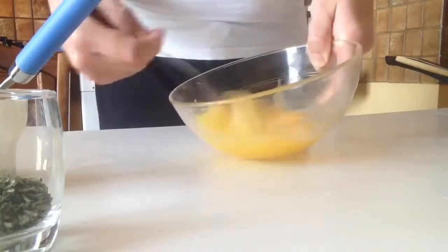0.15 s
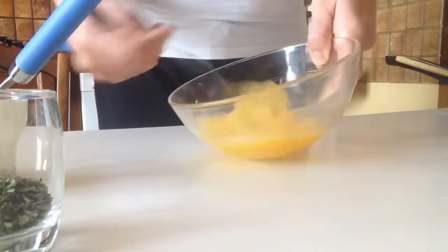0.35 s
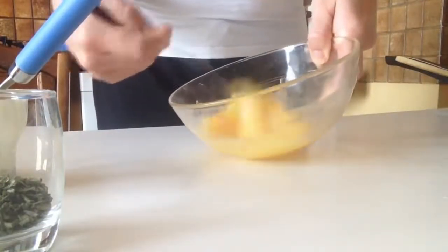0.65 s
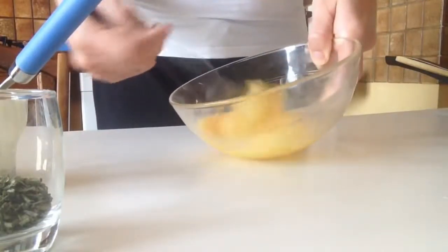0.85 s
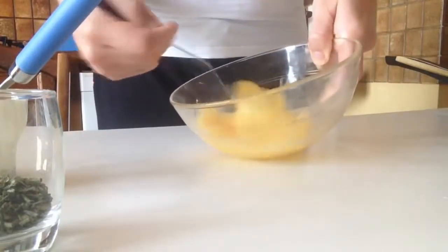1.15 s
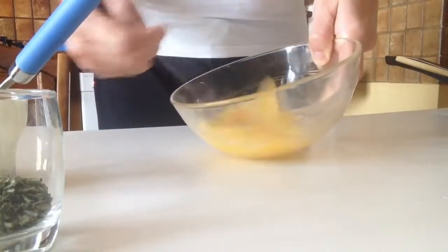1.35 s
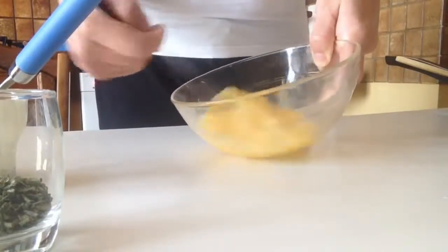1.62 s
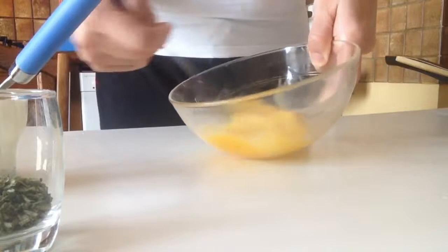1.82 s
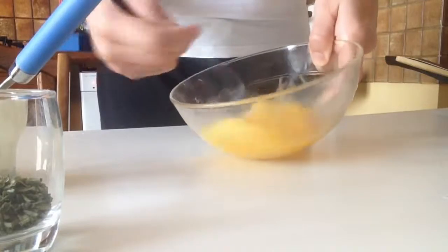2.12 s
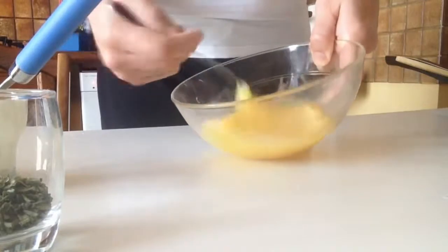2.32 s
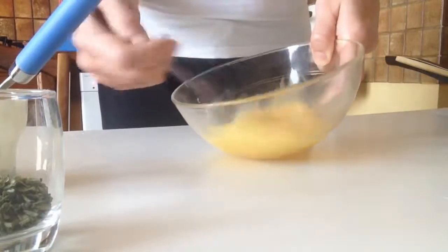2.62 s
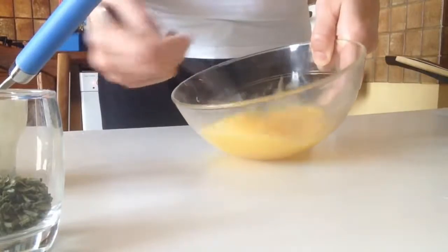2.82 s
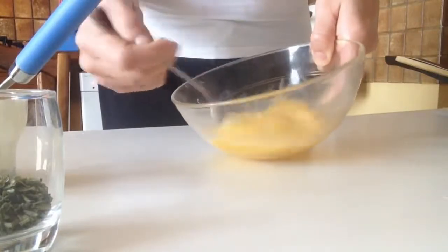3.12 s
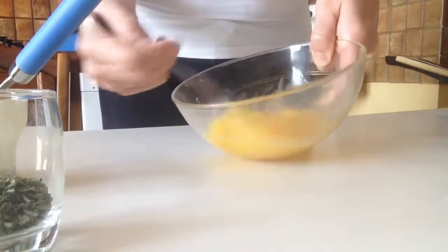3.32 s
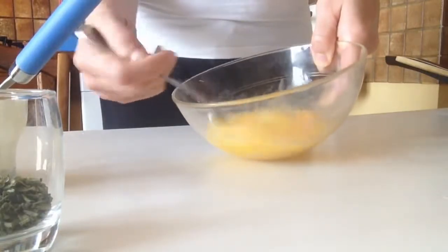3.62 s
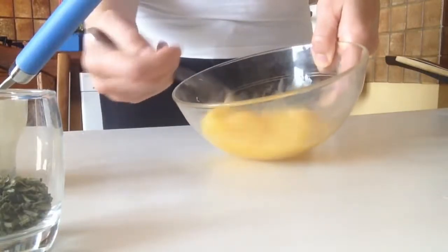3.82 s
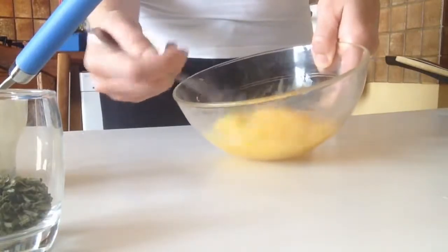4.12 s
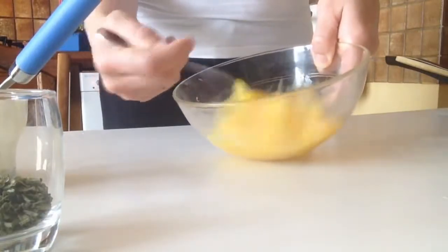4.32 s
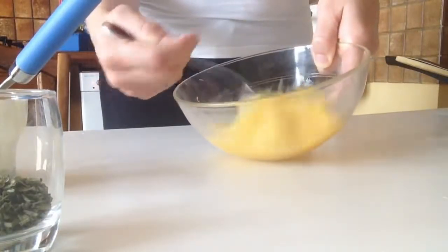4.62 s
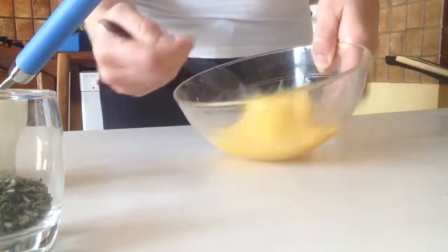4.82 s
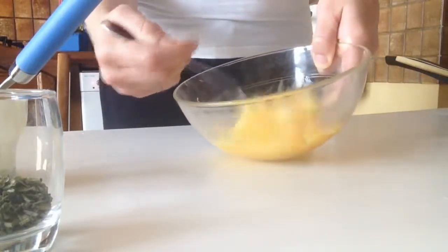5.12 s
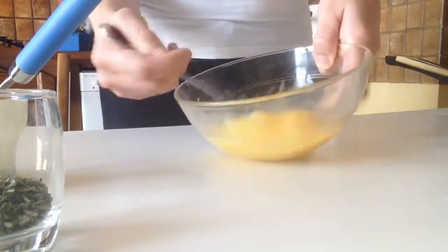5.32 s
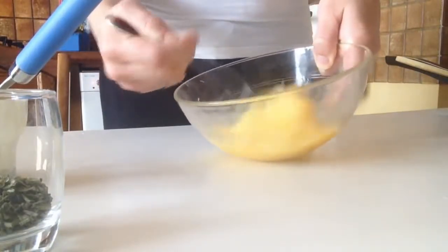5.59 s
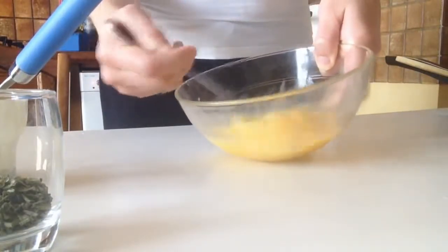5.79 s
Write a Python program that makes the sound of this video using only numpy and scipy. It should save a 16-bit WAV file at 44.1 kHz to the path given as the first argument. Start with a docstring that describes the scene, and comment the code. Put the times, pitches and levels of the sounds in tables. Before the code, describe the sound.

Close to the microphone, fork tines clink hard against a glass bowl five times, thumping the counter and slapping liquid egg. The sound dips for a moment, then settles into fast, lighter whisking: bright clicks, short skids on the glass, splashes and little bubbly plops, with a stronger knock just before the end. A tiled kitchen adds a short echo over faint, even room noise.

```python
"""A tiled kitchen, one small microphone close to a hand-held glass bowl of eggs on the counter.
A steel fork opens with five hard knocks that ring the bowl wall, thump the counter and run on into
scrapes. Egg splashes, the room answers over a steady hush, and air pockets plop. After a short lull near
one second the beating goes on more lightly, about six strokes a second, the tines knocking and skidding
on the glass. One harder knock comes just before the end, at about six seconds."""
import sys
import numpy as np
from scipy import signal
from scipy.fft import rfft, irfft
from scipy.io import wavfile
from scipy.ndimage import uniform_filter1d

SR = 44100
rng = np.random.default_rng(int(sys.argv[2]) if len(sys.argv) > 2 else 0)


def transcribe(signal):
    """Save signal, clipped to [-1, 1], as a 16-bit WAV file at the path in sys.argv[1]."""
    frames = np.atleast_2d(signal).T
    limited = np.clip(frames, -1, 1)
    pcm = np.round(limited * 32767).astype(np.int16)
    wavfile.write(sys.argv[1], SR, pcm)


N = 262395

# Modes rung by both knocks and skids. Each row: pitch in Hz, level in dB, time to fall 60 dB in seconds.
TINE_MODES = [(5836, -9, 0.012), (6620, -8, 0.011), (6880, -2, 0.0056), (7570, -3, 0.0076),
              (8830, -2.5, 0.004), (8610, -15.5, 0.0023), (10080, -8.5, 0.0086), (11410, -8.5, 0.0029),
              (11420, -3, 0.0089), (12500, -0.5, 0.0026), (13280, -7.5, 0.0089), (15650, -2.5, 0.0057)]   # fork tines in egg
BOWL_FLOOR_MODES = [(1090, -2, 0.012), (1500, -4.5, 0.026), (1950, 4, 0.0096), (2430, -2.5, 0.018),
                    (2973, -8, 0.018), (3364, -8.5, 0.019), (4410, -11, 0.01)]   # damped by the egg
BOWL_WALL_MODES = [(1550, -3.5, 0.029), (1870, -9.5, 0.04), (2612, -2.5, 0.046), (2670, -7, 0.043),
                   (3937, 0, 0.026), (3996, -3.5, 0.05), (5520, -10, 0.032), (5512, -13, 0.11),
                   (5523, 5, 0.05), (7210, -3, 0.099), (7300, -11.5, 0.17), (8100, -24, 0.034),
                   (9400, 1.5, 0.011), (11200, -10, 0.027), (12800, -11, 0.065)]   # held in the hand; the strong modes split into beating pairs


def from_db(db):
    """Decibels to gain."""
    return 10 ** (np.asarray(db) / 20)


def at_hz(points, hz):
    """Reads a table on a log-frequency axis."""
    point_hz, values = np.transpose(points)
    return np.interp(np.log(np.maximum(hz, 1)), np.log(point_hz), values)


def ring(clicks, hz, t60):
    """A unit click sets a decaying sine of height 1 ringing."""
    r, w = from_db(-60 / (t60 * SR)), 2 * np.pi * hz / SR
    return signal.lfilter([0, np.sin(w)], [1, -2 * r * np.cos(w), r * r], clicks + 1e-18)


def excite(clicks, modes):
    """A click train rings all modes of one body."""
    return sum(from_db(db) * ring(clicks, hz, t60) * (-1) ** k for k, (hz, db, t60) in enumerate(modes))


def strike(times, level_db, modes, spread_db, detune, contact_s, stagger_s, later_db,
           spot_hz=None, spot_db=0):
    """Each blow rings all modes with its own strengths and detuning; four tines land a moment apart."""
    mode_hz, mode_db, t60 = np.transpose(modes)
    t = np.arange(int(1.2 * t60.max() * SR))[:, None] / SR
    decay = (1 - np.exp(-t / contact_s)) * from_db(-60 * t / t60)
    chance = rng.standard_normal((len(times), 4, 3, len(modes)))
    lag = rng.random((len(times), 4)) * [0, 1, 1, 1]
    out = np.zeros(N + 2 * len(t) + 1000)
    for k, (s, db) in enumerate(zip(times, level_db)):
        hz, gain_db = mode_hz * (1 + detune * chance[k, 0, 1]), mode_db + db
        if spot_hz is not None:
            nearest = np.argmin(abs(np.log(mode_hz / spot_hz[k])))
            hz[nearest] = spot_hz[k]
            gain_db[nearest] += spot_db
        waves = decay * np.sin(2 * np.pi * t * hz)
        for (strength, _, sign), late in zip(chance[k], lag[k]):
            height = from_db(gain_db + spread_db * strength + later_db * (late > 0)) * np.sign(sign)
            at = int((s + late * stagger_s) * SR)
            out[at:at + len(t)] += waves @ height
    return out[:N]


def fork_on_glass(times, tine_db, floor_db, wall_db, spot_hz):
    """Tines, bowl floor and wall ring together; the spot hit favours and retunes the nearest floor mode."""
    tines = strike(times, tine_db, TINE_MODES, spread_db=3.5, detune=0.027,
                   contact_s=0.00053, stagger_s=0.003, later_db=-7)
    floor = strike(times, floor_db, BOWL_FLOOR_MODES, spread_db=3.5, detune=0.058,
                   contact_s=0.00096, stagger_s=0.003998, later_db=-9, spot_hz=spot_hz, spot_db=6.5)
    wall = strike(times, wall_db, BOWL_WALL_MODES, spread_db=3, detune=0.00061,
                  contact_s=0.0012, stagger_s=0.0022, later_db=-6)
    return tines + floor + wall


def counter_thump(times, thump_db):
    """A knock thumps the counter: one low, quickly damped mode."""
    return strike(times, thump_db, [(324.3, 0, 0.025)], spread_db=1.9, detune=0.11,
                  contact_s=0.00091, stagger_s=0.0018, later_db=-16.5)


def booms(times, thump_db):
    """The counter and the room's lowest modes swell after a thump and ring on."""
    # Each row: pitch in Hz, level in dB, time to fall 60 dB in seconds.
    high_modes = [(259.3, 0.5, 0.27), (325.4, -3.5, 0.36), (376.5, -9.5, 0.23), (450.4, -3.5, 0.16),
                  (515, -28, 0.12)]
    deep_modes = [(140.3, -1.5, 0.19), (174.6, -2, 0.46), (209.8, 1.5, 0.15)]
    high_db, deep_db = thump_db - 15.5, 0.52 * thump_db - 27
    out = 0
    for modes, level_db, swell_s in [(high_modes, high_db, 0.068), (deep_modes, deep_db, 0.0066)]:
        for hz, db, t60 in modes:
            heights = from_db(level_db + db + rng.normal(0, 2.6, len(times)))
            clicks = np.zeros(N)
            clicks[(times * SR).astype(int)] = heights * rng.choice([-1, 1], len(times))
            out = out + ring(clicks, hz, t60) - ring(clicks, hz, swell_s)
    return out


def uneven_clicks(per_s, spread_db):
    """Clicks at random moments, most small and a few large."""
    sizes = from_db(spread_db * np.minimum(rng.exponential(1, N), 4)) * rng.choice([-1, 1], N)
    return sizes * (rng.random(N) < per_s / SR)


def skid(times, floor_db, wall_db):
    """After a knock the tines skid over the glass in dense clicks, reaching the wall where it is dry."""
    # Knocks that run on into a firm scrape. Each row: start in seconds, pressure in dB, length in seconds.
    scrapes = [(0.0004, -42.5, .1), (0.152, -48.5, 0.11), (0.2963, -40, .11), (0.4722, -43.5, .13),
               (0.6519, -55, 0.078), (1.5932, -47.5, 0.11), (1.8864, -51.5, .1), (2.0592, -45.5, 0.057),
               (2.2423, -49, .1), (2.466, -45.5, 0.096), (2.648, -42, 0.073), (2.816, -44.5, 0.13),
               (2.9702, -46, .09), (3.002, -48.5, .07), (3.1426, -47.5, .1), (3.647, -47.5, 0.055),
               (4.13, -48, 0.042), (4.296, -45.5, .086), (4.4495, -42.5, 0.05), (5.3807, -47, 0.075),
               (5.6885, -43.5, .06), (5.8614, -40, .07)]
    pressure_db = 0.41 * floor_db - 38   # all other knocks skid lightly and briefly
    length_s = np.minimum(0.54 * np.diff(times, append=N / SR), 0.039)
    for s, db, scrape_s in scrapes:
        k = np.argmin(abs(times - s))
        pressure_db[k], length_s[k] = db, scrape_s
    t = np.arange(N) / SR
    last = np.clip(np.searchsorted(times, t) - 1, 0, None)
    since = np.maximum(t - times[last], 0)
    envelope = np.clip(2 - 2 * since / length_s[last], 0, 1) * (1 - np.exp(-since / 0.0064))
    stutter = from_db(2.4 * np.sqrt(150) * uniform_filter1d(rng.standard_normal(N), size=150))
    pressure = from_db(pressure_db[last]) * envelope * stutter
    clicks = pressure * uneven_clicks(per_s=4000, spread_db=3.44)
    wall_share = from_db(np.minimum(wall_db[last] + 20, 1.5))
    wall = excite(clicks * wall_share, BOWL_WALL_MODES)
    floor = from_db(-7) * excite(clicks, BOWL_FLOOR_MODES)
    return excite(clicks, TINE_MODES) + floor + wall + splatter(pressure)


def splatter(pressure, cycles=15.7):
    """Egg torn by the tines bursts in small bubbles of scattered sizes."""
    bursts = from_db(7) * pressure * uneven_clicks(per_s=390, spread_db=4.03)
    pitches_hz, dealt = np.geomspace(750, 5000, 18), rng.integers(0, 18, N)
    return sum(ring(bursts * (dealt == k), hz, cycles / hz) for k, hz in enumerate(pitches_hz))


def splash(times, splash_db, t60=0.033, band_hz=(2640, 10500)):
    """Egg slapped against the glass: a short broad burst of crackle."""
    clicks = np.zeros(N)
    clicks[(times * SR).astype(int)] = from_db(splash_db)
    burst = signal.lfilter([1], [1, -from_db(-60 / (t60 * SR))], clicks + 1e-18)
    crackle = rng.standard_normal(N)
    crackle *= from_db(0.56 * np.sqrt(20) * uniform_filter1d(rng.standard_normal(N), size=20))
    return signal.sosfilt(signal.butter(2, band_hz, "band", fs=SR, output="sos"), burst * crackle)


def kitchen(x, level_db=-5, delay_s=0.00044, build_s=0.0026):
    """Dense reflections off the tiles: noise that builds up quickly, then dies band by band."""
    # The room's decay. Each row: frequency in Hz, time to fall 60 dB in seconds.
    decay_times = [(100, 0.82), (300, 0.82), (1800, 0.53), (5000, 0.53), (13000, 0.31)]
    # The room's colour. Each row: frequency in Hz, level in dB.
    colour = [(100, 2.5), (400, 0.5), (1500, 0.5), (4000, 3.5), (8000, 1.5), (15000, 6.5)]
    t = np.arange(int(0.7 * SR)) / SR
    edges_hz, tail = 80 * 2 ** np.arange(0, 7.8, 0.5), 0
    white = rng.standard_normal((2, len(t)))
    for k, (low, high) in enumerate(zip(edges_hz, edges_hz[1:])):
        band = signal.sosfilt(signal.butter(2, [low, high], "band", fs=SR, output="sos"), white[k % 2])
        hz = np.sqrt(low * high)
        tail = tail + band * from_db(at_hz(colour, hz) - 60 * t / at_hz(decay_times, hz))
    tail *= 1 - np.exp(-np.maximum(t - delay_s, 0) / build_s)
    return from_db(level_db) * signal.fftconvolve(x, tail / np.sqrt(np.sum(tail ** 2)))[:N]


def hush(level_db=-53.5):
    """Room tone: steady coloured noise under everything."""
    # Each row: frequency in Hz, relative noise density in dB.
    spectrum = [(25, 4), (60, 36), (150, 0), (440, -4), (2000, 15), (5000, -2), (15500, -13)]
    hz = np.fft.rfftfreq(N, 1 / SR)
    noise = irfft(rfft(rng.standard_normal(N)) * from_db(at_hz(spectrum, hz)), N)
    return from_db(level_db) * noise / noise.std()


def plops(cycles=16.5, rise=0.0028, gurgle_db=-14, gurgle_s=0.045):
    """An air pocket closing in the egg rings briefly as its pitch climbs; three fainter ones crowd it."""
    # Each row: start in seconds, peak level in dB, starting pitch in Hz.
    pockets = [(0.152, -8.5, 753), (0.289, -13, 652), (0.471, -20, 656), (0.65, -24, 670),
               (0.782, -31.5, 960), (1.093, -27, 930), (1.176, -23, 966), (1.348, -27.5, 1130),
               (1.593, -11.5, 880), (1.678, -18.5, 837), (1.749, -24.5, 700), (1.89, -22.5, 900),
               (2.054, -23.5, 915), (2.149, -27, 1060), (2.265, -35, 1180), (2.594, -27, 1100),
               (2.777, -34, 1170), (2.818, -28, 1140), (3.2, -31, 1120), (3.532, -25.5, 1040),
               (3.65, -30, 730), (3.704, -22.5, 1050), (3.808, -17.5, 1040), (3.973, -26.5, 663),
               (4.129, -17.5, 790), (4.296, -20, 564), (4.419, -31.5, 676), (4.606, -29, 705),
               (4.749, -32, 650), (4.894, -33, 850), (4.925, -14.5, 615), (5.212, -30, 950),
               (5.377, -21.5, 692), (5.68, -29.5, 720), (5.862, -26, 920)]
    out, t = np.zeros(N + 9000), np.arange(2000) / SR
    for (s, db, hz), chance in zip(pockets, rng.random((len(pockets), 3, 3))):
        gurgle = [(s + gurgle_s * (late - 0.2), db + gurgle_db - 8 * faint, hz * 2 ** (1.09 * high - 0.45))
                  for late, faint, high in chance]
        for start_s, level_db, pitch_hz in [(s, db, hz)] + gurgle:
            turns = pitch_hz * t
            shape = (1 - np.exp(-turns / 0.72)) * from_db(-60 * turns / cycles)
            chirp = np.sin(2 * np.pi * turns * (1 + rise * turns))
            at = int(start_s * SR)
            out[at:at + len(t)] += from_db(level_db) * shape / shape.max() * chirp
    return out[:N]


def scene():
    """The bowl close up with the kitchen around it, in mono."""
    # Tines landing on glass. Each row: start in seconds, tine level in dB, bowl floor level in dB,
    # pitch of the spot hit in Hz, counter thump in dB, egg splash in dB.
    knocks = [(0.0004, -12, -17.5, 1664, -11, -14), (0.152, -8, -11, 2620, -16.5, -8.5),
              (0.2967, -3, -8.5, 2640, -8.5, -10), (0.4718, -4.5, -13, 1550, -12.5, -5.5),
              (0.652, -7.5, -15.5, 1550, -17, -9), (0.82, -31, -43, 1890, -57, -49),
              (0.9616, -27, -49, 1690, -41, -29), (0.979, -19, -36, 1870, -30, -26.5),
              (1.1259, -22.5, -38, 1920, -28, -32), (1.291, -20.5, -29, 1920, -25, -37),
              (1.3481, -14, -28, 2230, -38, -26), (1.4483, -19, -27, 2570, -24, -45),
              (1.512, -20.5, -35.5, 2450, -39, -30), (1.5931, -14, -31, 1680, -30, -37),
              (1.6397, -12.5, -24.5, 2260, -30, -18.5), (1.7146, -16, -27.5, 1950, -26.5, -40),
              (1.7503, -16, -21.5, 2430, -17, -7.5), (1.8868, -32, -31.5, 1950, -35, -20),
              (1.9367, -14.5, -48, 1690, -53, -41), (1.9594, -24, -39, 3250, -25, -25),
              (2.0593, -12.5, -28, 2490, -34, -33), (2.141, -14.5, -30, 1700, -18, -24),
              (2.2428, -18.5, -28, 1704, -32, -25), (2.2752, -13.5, -26.5, 2430, -27.5, -36),
              (2.3229, -21, -27.5, 1870, -19.5, -26), (2.465, -12, -22, 2430, -21.5, -42),
              (2.5952, -8, -26, 2400, -19.5, -45), (2.648, -9.5, -19.5, 2430, -15, -19),
              (2.7767, -10, -22, 2430, -24, -21), (2.816, -8, -24.5, 1960, -21, -23.5),
              (2.865, -24, -31, 1890, -25, -19), (2.9701, -14.5, -29, 1900, -31.5, -19.5),
              (3.002, -21, -25, 1680, -42, -22), (3.032, -23.5, -33, 1410, -27, -23),
              (3.1425, -12, -22.5, 1680, -25, -29), (3.195, -18, -26, 1440, -18.5, -24),
              (3.319, -12, -19.5, 1500, -21, -45), (3.3673, -23, -31, 2460, -22, -20.5),
              (3.4825, -14.5, -27, 2400, -24, -27), (3.5298, -19, -31.5, 3220, -19.5, -27),
              (3.647, -14.5, -19.5, 2400, -23, -19.5), (3.697, -23, -28, 2430, -22.5, -22),
              (3.8128, -13, -25, 2440, -22.5, -30), (3.862, -22, -27.5, 1490, -17.5, -45),
              (3.9715, -12.5, -22, 1780, -23.5, -25), (4.0144, -21, -30, 1440, -22, -26.5),
              (4.13, -12, -16.5, 2510, -25, -19.5), (4.1774, -19, -33, 2050, -17.5, -29),
              (4.296, -11, -24.5, 2540, -22.5, -40), (4.3312, -24, -34, 1390, -19, -29),
              (4.4498, -15.5, -23.5, 2430, -22, -45), (4.6108, -21, -33.5, 2380, -38, -44),
              (4.6398, -20, -31, 1800, -22.5, -41), (4.7595, -18, -27.5, 2070, -27, -45),
              (4.7858, -20.5, -30, 2000, -24, -36), (4.915, -24, -28, 1365, -32, -29),
              (4.944, -23.5, -29.5, 1360, -26, -26), (5.0709, -21, -33, 2430, -46, -41),
              (5.0988, -22, -30.5, 2380, -26.5, -45), (5.228, -20.5, -30.5, 3270, -31, -42),
              (5.243, -26, -31.5, 2440, -27.5, -35), (5.3754, -28, -36, 3350, -50, -16),
              (5.3815, -15, -27, 2700, -24.5, -18), (5.551, -20.5, -31, 2450, -26, -45),
              (5.678, -19, -32, 2610, -37, -19.5), (5.6883, -24, -25.5, 2860, -38, -27.5),
              (5.7022, -40, -36, 1420, -27.5, -23), (5.8414, -8, -18.5, 2520, -17, -22),
              (5.862, -35, -29.5, 2180, -32, -42), (5.8791, -42, -33, 2250, -26, -35)]
    # Knocks that land high on the dry wall and ring it. Each row: start in seconds, wall level in dB.
    dry_knocks = [(0.0004, -17.5), (0.152, -18), (0.2963, -14.5), (0.4722, -27), (0.6519, -24),
                  (1.7156, -42), (1.7492, -16.5)]
    times, tine_db, floor_db, spot_hz, thump_db, splash_db = np.transpose(knocks)
    wall_db = tine_db - 37.5   # under egg the wall barely rings
    for s, db in dry_knocks:
        wall_db[np.argmin(abs(times - s))] = db
    clinks = fork_on_glass(times, tine_db, floor_db, wall_db, spot_hz)
    thump = counter_thump(times, thump_db)
    low_ring = booms(times, thump_db)
    bright = clinks + skid(times, floor_db, wall_db) + splash(times, splash_db)
    pockets = plops()
    # sounds from deep in the egg or the counter reach the room more weakly
    sent = bright + from_db(-2) * pockets + from_db(-4.5) * thump
    return (bright + pockets + thump + low_ring + kitchen(sent) + hush())[None]


def record(dry, clip_level=0.88, cutoff_hz=16500):
    """The deep bass is thinned, the loudest knocks clip, and the highest treble is cut off."""
    thin = signal.sosfilt(signal.butter(4, 115, "high", fs=SR, output="sos"), dry) + from_db(-34) * dry
    clipped = np.clip(thin, -clip_level, clip_level)
    softened = signal.sosfilt(signal.butter(8, 14800, fs=SR, output="sos"), clipped)
    return signal.sosfilt(signal.cheby2(20, 90, cutoff_hz, fs=SR, output="sos"), softened)


dry = scene()
out = record(dry)
transcribe(out)
```